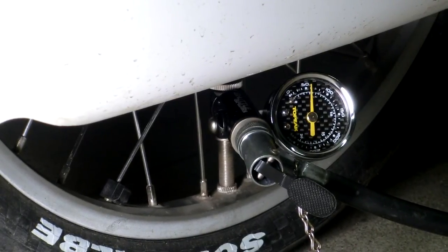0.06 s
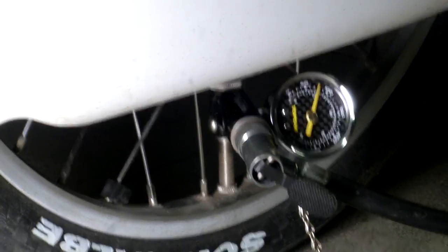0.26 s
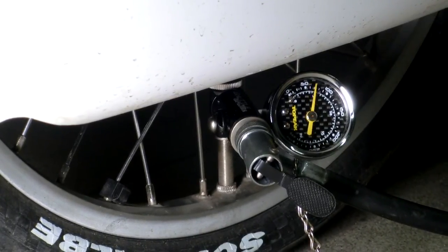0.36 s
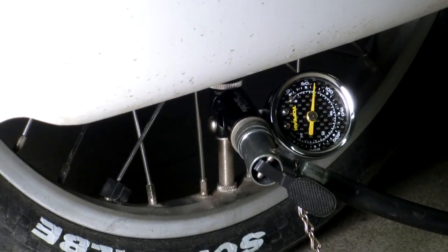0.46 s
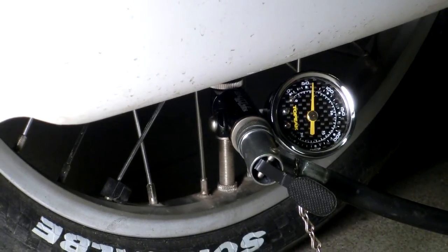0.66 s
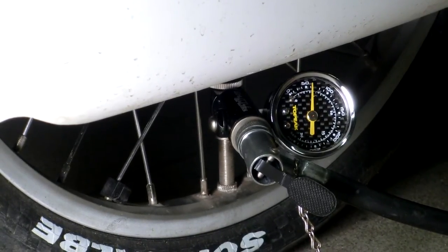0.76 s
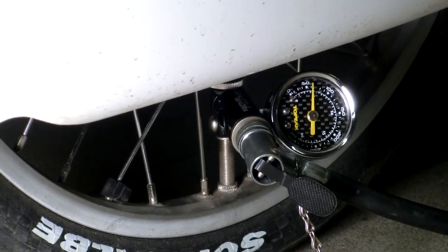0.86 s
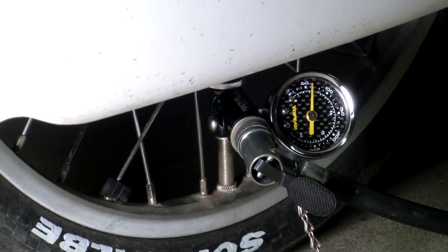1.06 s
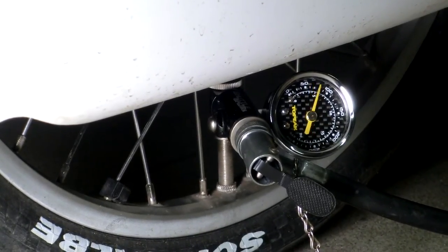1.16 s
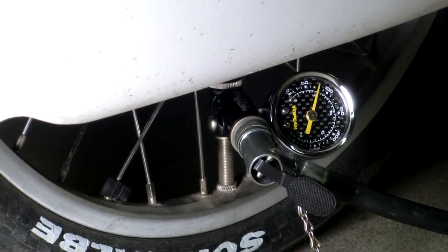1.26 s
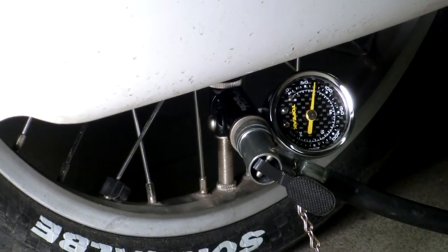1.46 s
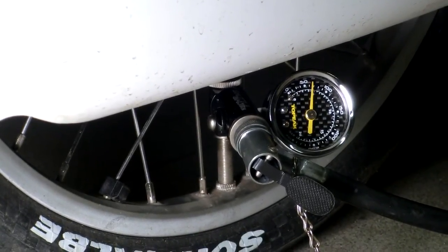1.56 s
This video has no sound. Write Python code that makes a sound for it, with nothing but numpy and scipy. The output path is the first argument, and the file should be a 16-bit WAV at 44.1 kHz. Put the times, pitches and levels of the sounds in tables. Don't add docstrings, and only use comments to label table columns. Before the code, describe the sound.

Bicycle pump heard close in a bare, echoing room: short airy hisses and valve ticks, a deep ringing thump, a quieter settling with faint seeps, then another puff with sharp clicks and a softer knock.

```python
import sys
import numpy as np
from scipy import signal
from scipy.fft import rfft, irfft
from scipy.io import wavfile
from scipy.ndimage import uniform_filter1d

SR = 44100
rng = np.random.default_rng(int(sys.argv[2]) if len(sys.argv) > 2 else 0)


def amplitude_ratio(level_db):
    exponent = np.asarray(level_db, float) / 20
    return 10 ** exponent


def inscribe(sig):
    pcm = np.round(np.clip(np.atleast_2d(sig).T, -1, 1) * 32767)
    wavfile.write(sys.argv[1], SR, pcm.astype(np.int16))


N = 70560

# pitch_hz, level_db (per Hz)
RUMBLE = [(24, -14), (40, -4.5), (91, -5.5), (274, -14.5), (350, -7.5), (395, -16), (440, -12), (490, -20),
          (1000, -32), (1300, -63), (2200, -120)]
# pitch_hz, level_db (per Hz)
FIZZ_COLOUR = [(530, -14), (900, -4), (2400, -7), (3100, -5), (7300, -9.5), (9000, -6), (12500, -8),
               (15500, -7.5)]
# start_s, end_s, level_db, pitch_hz, width_hz
VALVE_SEEPS = [
    (0.18, 0.41, -62.5, 9250, 450),
    (.5, 0.787, -63, 8830, 710),
    (0.48, 0.77, -63, 11000, 1200),
    (.48, 0.525, -60, 8100, 300),
    (.495, 0.52, -64, 13000, 200),
    (0.627, 0.7, -66, 5800, 230),
    (.44, 0.566, -66, 3000, 900),
    (0.42, .58, -65, 4700, 260),
]
# start_s, pitch_hz, peak_db, t60_s
FRAME_WOBBLES = [(0.111, 127, -48.5, 0.58), (0.132, 448, -49, 0.15), (0.086, 86, -62, .4), (0, 68, -42, .3),
                 (.62, 790, -56.5, .4), (.53, 500, -47.5, 0.58), (0.37, 83.4, -25.5, 1.05),
                 (0.29, 83.7, -21.5, 0.28), (0.25, 95, -23, 0.18), (1.092, 450, -40, 0.12),
                 (1.205, 330, -42, 0.3), (1.16, 62, -44, 0.32), (0.661, 355, -45.5, 0.23),
                 (1.152, 392.7, -32.5, 0.17), (1.362, 848, -37, 0.062), (0.861, 77.5, -50, 0.41),
                 (0.949, 100, -49, .3), (1.085, 755, -39, 0.07), (1.155, 131, -33, 0.29),
                 (1.205, 137, -37.5, 0.26), (1.225, 85, -36, 0.39), (1.25, 54, -34.5, 0.42),
                 (1.372, 95.4, -34.5, 0.2), (1.385, 821, -43, 0.22), (1.385, 275, -37.5, 0.11)]
# start_s, pitch_hz, peak_db, t60_s
SPOKE_RINGS = [(0.11, 1740, -45, 0.08), (0.211, 3110, -52.5, 0.67), (0.264, 11680, -35, 0.19),
               (1.094, 3001, -49, 0.79), (1.094, 1504, -50, 0.44), (1.366, 4630, -41, 0.24),
               (1.388, 4605, -44, 0.33), (1.366, 3035, -52.5, 0.6), (1.385, 1500, -51.5, 0.43),
               (1.365, 9000, -40, 0.12), (1.15, 9750, -62, 0.91)]
# start_s, peak_db, push_ms
FOOT_THUDS = [
    (.2409, -20, 2.6),
    (1.169, -34, 2.85),
    (1.2316, -29.5, 3.5),
    (1.244, -33.5, 3.22),
    (1.2505, -32.5, 3.38),
    (1.261, -29, 5.18),
    (1.275, -35.5, 4.55),
    (1.286, -33, 6.3),
    (1.311, -39, 4.9),
    (1.338, -37.5, 4.6),
]
# start_s, peak_db, pitch_hz, length_ms, broadband_db
PART_TICKS = [(0.0928, -36, 4130, 6.4, 1), (0.1205, -25, 6800, 2.2, 0), (0.139, -28, 7000, 3, -14),
              (0.2093, -24, 5350, 4, 3), (0.2423, -27, 8950, 3.4, 4), (0.4179, -31.5, 3300, 3.3, -3),
              (0.425, -36, 2600, 2.2, 1), (0.448, -34, 3180, 4.4, 2), (0.855, -52, 7200, 2, -14),
              (0.828, -54, 6830, 1.9, -18), (0.919, -38.5, 3540, 3.4, 5), (0.947, -34, 8200, 3.3, 4),
              (1.044, -31, 3330, 2.9, 9), (1.077, -27.5, 7100, 3.1, -6), (1.0892, -21, 7300, 1.5, -10),
              (1.0911, -19, 7600, 1.5, -4), (1.0922, -26.5, 4970, 3.5, 2), (1.094, -25, 3470, 1.5, -4),
              (1.1025, -34, 3000, 2.3, -4), (1.108, -30, 7700, 2.5, -13), (1.1145, -34, 7200, 3, -10),
              (1.15, -19.5, 5300, 1.9, 8), (1.1741, -32, 2920, 2.8, 1), (1.208, -35, 7450, 2.6, -17),
              (1.256, -33.5, 7460, 2.4, -11), (1.269, -49, 7600, 3, -12), (1.28, -38, 7600, 1.8, -13),
              (1.327, -41, 7400, 3, -10), (1.366, -18, 5040, 1.4, 5), (1.3659, -25, 2200, 1.5, 2),
              (1.3697, -26.5, 3270, 2.3, 6), (1.389, -35, 4700, 1.8, -4)]
# start_s, peak_db, push_ms
PISTON_BLOWS = [
    (.2421, -11, 1.38),
    (.2448, -21, 1.05),
    (1.3975, -34.5, 0.86),
]
# pitch_hz, level_db, t60_s
BODY_MODES = [(50.1, -3, 0.96), (171, 0.5, 0.1), (122.2, 0.5, 0.48), (165.7, -8.5, 0.77),
              (231.6, -8.5, 0.82), (297.2, -10.5, 0.83), (358.2, -7.5, 0.64), (396, -3, 0.195),
              (493, -13, 0.94), (638, -15, 0.29), (740, -20.5, .4), (910, -22, 0.47), (1040, -22, 0.42),
              (1754, -12, 0.12)]
# start_s, level_db, hold_s, t60_s, whistle_hz
AIR_PUFFS = [(0.0, -44.5, 0.0055, 0.74, 6500), (0.109, -43.5, 0.042, 0.82, 7100),
             (.209, -38.5, .02, 0.28, 13500), (.242, -39.5, 0.028, 0.28, 7900),
             (0.415, -48, 0.013, 0.61, 3200), (0.915, -50, 0.029, 1, 6700),
             (1.0755, -41.5, 0.012, 0.35, 7340), (1.088, -40, 0.041, 0.42, 7100),
             (1.042, -50, 0.0093, 0.43, 3040), (1.17, -41.5, 0.012, 0.57, 7700),
             (1.382, -43.5, 0.012, 0.36, 3030)]
# pitch_hz, level_db (per Hz)
JET_COLOUR = [(350, -47), (600, 1.5), (1360, -12), (1510, -5), (2100, -12), (2990, -7.5), (3570, -9),
              (7040, -13), (15500, -8)]
# pitch_hz, width_hz, level_db
AIR_PASSAGES = [(1860, 270, -5), (3080, 510, -2.5), (4880, 150, -0.5), (7100, 520, -1.5),
                (9080, 1100, -1.5), (11300, 3600, -6), (13500, 1400, -10)]
# pitch_hz, t60_s
ROOM_DECAY = [(60, 1.0), (250, 0.69), (1000, 0.92), (4000, 0.32), (14000, 0.71)]
# pitch_hz, likeness_0_to_1
PORT_LIKENESS = [(30, .9), (55, .6), (88, .3), (125, 0.97), (300, 0.98), (600, 0.92), (1650, 0.86),
                 (4970, 0.5), (15000, 0.35)]
# pitch_hz, lead_radians
PORT_LEAD = [(0, 0.5), (4310, 0.03), (8960, -1.6), (15100, -2.5), (15700, 13), (16000, 19)]
# pitch_hz, level_db
PORT_TILT = [(60, -0.5), (240, -1.0), (950, -1.0), (3770, 0), (15000, .5)]
# pitch_hz, level_db
MIC_RESPONSE = [(20, -15), (45, -0.5), (12000, 0), (14500, -2.5), (15800, -12)]


def evened(x):
    return x / np.sqrt(np.mean(x ** 2) + 1e-20)


def read(points, hz):
    f, value = np.transpose(points)
    return np.interp(np.log(hz + 1), np.log(f + 1), value)


def add(mix, start_s, sound):
    part = mix[..., max(round(start_s * SR), 0):][..., :sound.shape[-1]]
    part += sound[..., :part.shape[-1]]


def equalised(x, curve):
    hz = np.fft.rfftfreq(x.shape[-1], 1 / SR)
    return irfft(rfft(x) * amplitude_ratio(read(curve, hz)), x.shape[-1])


def resonate(x, hz, width_hz):
    r = np.exp(-np.pi * width_hz / SR)
    return signal.lfilter([1 - r, 0, r - 1], [1, -2 * r * np.cos(2 * np.pi * hz / SR), r * r], x)


def ring(hz, db, t60, rise_s, turn):
    t = np.arange(SR) / SR
    envelope = amplitude_ratio(db - 60 * t / t60) * (1 - np.exp(-t / rise_s))
    return envelope * np.sin(2 * np.pi * (hz * t + turn))


def wander(depth_db, noise, smooth_samples):
    return amplitude_ratio(depth_db * evened(uniform_filter1d(noise, size=smooth_samples)))


def hose(noise):
    return evened(sum(amplitude_ratio(db) * evened(resonate(noise, hz, width)) for hz, width, db in AIR_PASSAGES))


def background():
    rumble, fizz = rng.standard_normal((2, 2, N))
    return amplitude_ratio(-50) * evened(equalised(rumble, RUMBLE)) + amplitude_ratio(-56) * evened(equalised(fizz, FIZZ_COLOUR))


def valve_seeps():
    t, out = np.arange(N) / SR, np.zeros((2, N))
    for start, end, db, hz, width_hz in VALVE_SEEPS:
        z = rng.standard_normal((3, N))
        fade = np.clip(np.minimum((t - start) / 0.01, (end - t) / 0.029), 0, 1)
        band = evened(resonate(resonate(z[:2], hz, width_hz), hz, width_hz))
        out += amplitude_ratio(db) * wander(2.0, z[2], 900) * fade * band
    return out


def frame_wobbles():
    out = np.zeros((2, N))
    for s, hz, db, t60 in FRAME_WOBBLES:
        sway = wander(1.65, rng.standard_normal(SR), 1500)
        turns = rng.random() + np.array([[0], [.25]])
        add(out, s, sway * ring(hz, db, t60, 0.0022, turns))
    return out


def spoke_rings():
    out = np.zeros(N)
    for s, hz, db, t60 in SPOKE_RINGS:
        flutter = wander(2.5, rng.standard_normal(SR), 500)
        add(out, s, flutter * ring(hz, db, t60, 0.0023, rng.random()))
    return out


def foot_thuds():
    out = np.zeros(N)
    for s, db, ms in FOOT_THUDS:
        u = np.arange(0, 3, 1000 / (ms * SR))
        add(out, s, -amplitude_ratio(db) * np.sin(np.pi * u) * np.sin(np.pi * u / 3) ** 1.6)
    return out


def part_ticks():
    out, t = np.zeros(N), np.arange(1500) / SR
    for s, db, hz, ms, wide_db in PART_TICKS:
        z = rng.standard_normal(len(t)) * np.minimum(t / 0.00091, 1) * np.exp(-t / (ms * 0.00095))
        z[SR // 1000] += 3.6
        pitched = evened(resonate(z, hz, 740))
        broadband = evened(resonate(z, 3700, 9900) + 0.097 * hose(z))
        tick = pitched + amplitude_ratio(wide_db) * broadband
        add(out, s - .001, amplitude_ratio(db) * tick / abs(tick).max())
    return out


def piston_blows():
    crack_db, crack_hz, crack_width_hz, crack_t60 = -28.5, 1360, 860, 0.36
    body_db, build_s = -11, 0.0018
    push, body, t = np.zeros(N), np.zeros((2, N)), np.arange(SR // 2) / SR
    for s, db, ms in PISTON_BLOWS:
        u = np.clip(t / (ms * 0.000975), 0, 2)
        add(push, s, -amplitude_ratio(db) * np.sin(np.pi * u) * np.sin(np.pi * u / 2) ** .5 * 1.38)
        crack = evened(resonate(rng.standard_normal((2, len(t))), crack_hz, crack_width_hz))
        add(body, s, amplitude_ratio(db + crack_db - 60 * t / crack_t60) * crack)
        for hz, mode_db, t60 in BODY_MODES:
            add(body, s, ring(hz, db + mode_db + body_db, t60, build_s, rng.random((2, 1))))
    return push, body


def air_puffs():
    whistle_db, whistle_width_hz, hose_db, grit_db, rise_s = -3.5, 2400, -15, 3, 0.00096
    out, t = np.zeros((2, N)), np.arange(SR // 2) / SR
    for s, db, hold, t60, hz in AIR_PUFFS:
        z = rng.standard_normal((3, len(t)))
        jet = evened(equalised(z[:2], JET_COLOUR)) + amplitude_ratio(hose_db) * hose(z[:2])
        dull_hz = min(1.82 * hz, 20000)
        jet = evened(signal.lfilter(*signal.butter(1, dull_hz, fs=SR), jet))
        jet = jet + amplitude_ratio(whistle_db) * evened(resonate(z[:2], hz, whistle_width_hz))
        envelope = np.minimum(t / rise_s, 1) * amplitude_ratio(db - 60 * np.maximum(t - hold, 0) / t60)
        add(out, s, envelope * evened(jet * wander(grit_db, z[2], 90)))
    return out


def room(x):
    hz, t, z = signal.stft(rng.standard_normal((2, SR)), SR, nperseg=256)
    dying = z * amplitude_ratio(-60 * t / read(ROOM_DECAY, hz)[:, None])
    tail = signal.istft(dying, SR, nperseg=256)[1]
    tail = tail * np.clip((np.arange(tail.shape[1]) / SR - .003) / 0.0021, 0, 1)
    return signal.fftconvolve(x[None], tail / np.linalg.norm(tail[0]), axes=1)[:, :N]


def ports(direct, diffuse):
    hz = np.fft.rfftfreq(N, 1 / SR)
    d, (a, b) = rfft(direct), rfft(diffuse)
    same = np.clip(read(PORT_LIKENESS, hz), 0, 1)
    half = np.exp(.5j * read(PORT_LEAD, hz)) * amplitude_ratio(read(PORT_TILT, hz) / 2)
    left = (d + a) * half
    right = (d + same * a + np.sqrt(1 - same ** 2) * b) / half
    return irfft(np.array([left, right]), N)


def scene():
    floor, seep, low, thin = background(), valve_seeps(), frame_wobbles(), spoke_rings()
    thud, tick, jets = foot_thuds(), part_ticks(), air_puffs()
    push, body = piston_blows()
    wet = room(amplitude_ratio(-15.5) * jets[0] + amplitude_ratio(-1.5) * tick + amplitude_ratio(-3.5) * push + amplitude_ratio(-10) * thud)
    return ports(tick + push + thud + thin, jets + seep + body + low + wet + floor)


def band_limit(x):
    return signal.sosfilt(signal.butter(12, 16430, fs=SR, output="sos"), x)


def record(dry):
    x = equalised(dry, MIC_RESPONSE)
    lowpass = signal.firwin(511, 15800, window=("kaiser", 9), fs=SR)
    x = signal.oaconvolve(x, lowpass[None], "same")
    return band_limit(x)


dry = scene()
out = record(dry)
inscribe(out)
```